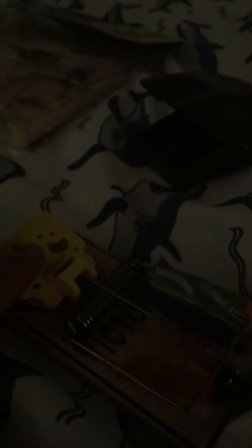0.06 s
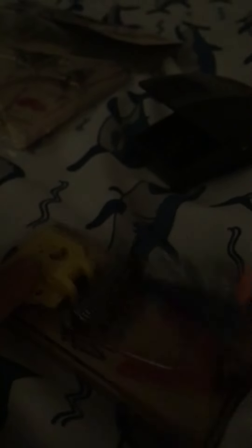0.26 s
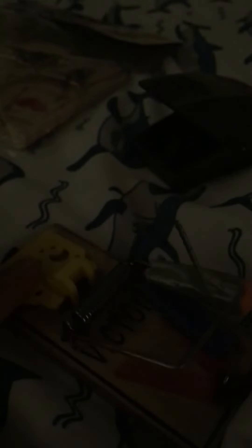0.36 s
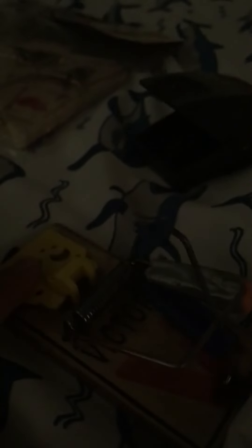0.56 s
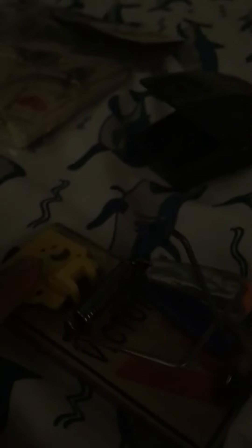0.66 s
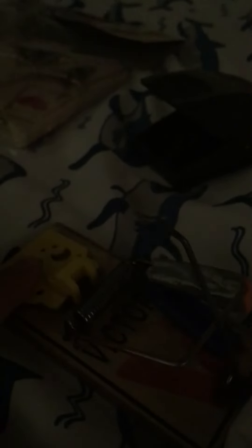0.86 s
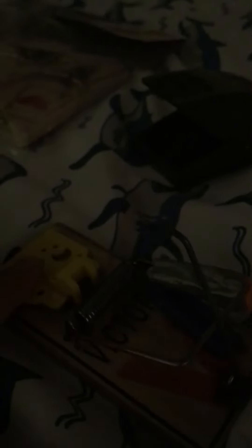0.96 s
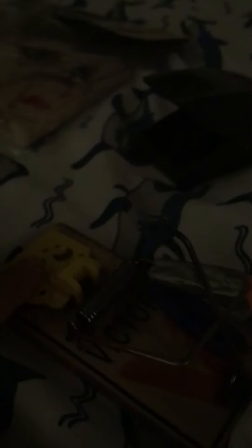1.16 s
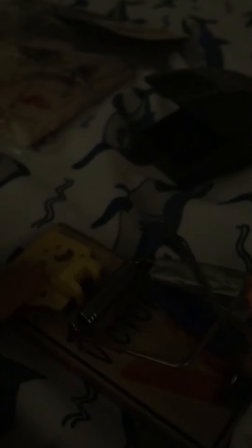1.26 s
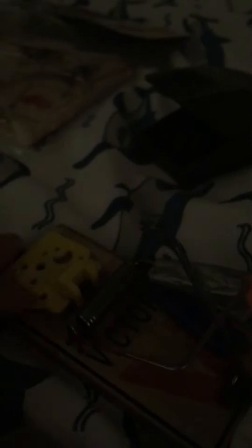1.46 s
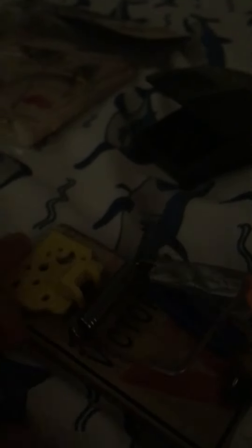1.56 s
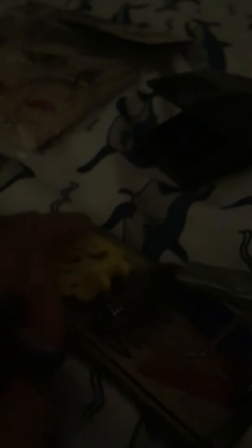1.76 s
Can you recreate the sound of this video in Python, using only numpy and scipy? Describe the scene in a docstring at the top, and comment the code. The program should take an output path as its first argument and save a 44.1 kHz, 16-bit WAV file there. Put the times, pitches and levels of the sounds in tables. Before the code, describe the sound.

A wooden mousetrap snaps shut with a sharp clatter, followed by soft knocks and rustling.

```python
"""A wooden snap trap springs: the catch scrapes and slips, and the wire bar snaps over and clatters.
Each impact excites the trap's damped modes as a sharp click, and the loose hook wire sings thinly.
The base knocks on the cloth it lies on, and the bedding heaves below at its low resonances.
Later a hand brushes in with friction noise, knocks the base and ticks the wire.
The quiet room adds faint reflections, hiss, a low hum and a rumble."""
import sys
import numpy as np
from scipy import signal
from scipy.fft import rfft, irfft
from scipy.io import wavfile

SR = 44100
rng = np.random.default_rng(int(sys.argv[2]) if len(sys.argv) > 2 else 0)


def store_pcm(level_fs):
    """Save levels as 16-bit WAV."""
    pcm = np.round(np.clip(level_fs, -1, 1) * 32767).astype(np.int16)
    wavfile.write(sys.argv[1], SR, np.atleast_2d(pcm).T)


N = 79380


def from_db(db):
    return 10 ** (np.asarray(db) / 20)


def unit_rms(x):
    return x / np.sqrt(np.mean(x ** 2) + 1e-20)


def envelopes(rows):
    """Linear interpolation: each column after the time becomes one value per sample."""
    times, *columns = np.transpose(rows)
    return [np.interp(np.arange(N) / SR, times, column) for column in columns]


def at_frequency(frequencies, values, hz):
    return np.interp(np.log(hz), np.log(frequencies), values)


def resonator(force, hz, t60):
    """Damped oscillator: a unit impulse starts a decaying sine of height about 1."""
    decay, angle = from_db(-60 / (t60 * SR)), 2 * np.pi * hz / SR
    return signal.lfilter([0, np.sin(angle)], [1, -2 * decay * np.cos(angle), decay ** 2], force + 1e-18)


def coloured_noise(spectrum):
    """Spectral shaping: white noise is weighted by a spectrum and scaled to rms 1."""
    hz = np.maximum(np.arange(N // 2 + 1) * SR / N, 5)
    gain = from_db(at_frequency(*np.transpose(spectrum), hz))
    return unit_rms(irfft(rfft(rng.standard_normal(N)) * gain, N))


def pushed_modes(modes, times, level_db, tilt_db=0, *, cycles):
    """Pulse excitation: each mode is driven by smooth pushes lasting `cycles` of its period."""
    out = np.zeros(N)
    for hz, db, t60 in modes:
        octaves = np.log2(hz / modes[0][0])
        impulses = np.zeros(N)
        impulses[(times * SR).astype(int)] = from_db(level_db + db + tilt_db * octaves)
        pulse = np.hanning(int(cycles * SR / hz) + 3)
        force = np.convolve(impulses, pulse / pulse.sum())[:N]
        out += resonator(force, hz, t60)
    return out


# Spectrum of the room noise: (frequency [Hz], relative level [dB])
ROOM_SPECTRUM = [(15, -60.5), (25, -34), (35, -12.5), (48, -5.5), (70, -2.5), (92, -14.5), (124, -6.5),
                 (146, -22), (232, -24), (553, -35), (634, -38), (3150, -43), (4990, -46.5), (14800, -43),
                 (16500, -60.5)]
def room(noise_db=-57, hum_hz=116.83, hum_db=-60.5, rumble_hz=60, rumble_db=-59.5):
    """Superposition: bass-heavy noise with faint hiss, a pure hum and a wavering narrow-band rumble."""
    rumble = unit_rms(resonator(rng.standard_normal(N + SR), rumble_hz, t60=0.0944)[SR:])
    hum = np.sqrt(2) * np.sin(2 * np.pi * hum_hz * np.arange(N) / SR)
    noise = coloured_noise(ROOM_SPECTRUM)
    return from_db(noise_db) * noise + from_db(hum_db) * hum + from_db(rumble_db) * rumble


# Envelope of the hand's stroke: (time [s], level [dB])
BRUSH_ENVELOPE = [(1.05, -91), (1.12, -74), (1.2, -65.5), (1.28, -71.5), (1.37, -71), (1.41, -61.5),
                  (1.48, -56), (1.55, -51), (1.62, -53), (1.69, -51), (1.8, -51)]
# Spectrum of the rubbed cloth: (frequency [Hz], relative level [dB])
BRUSH_SPECTRUM = [(180, -19), (300, -1), (399, -11), (1450, -11), (1580, -10.5), (4460, -15.5), (14900, -8),
                  (15700, -24.5), (16500, -33.5)]
def hand_brush():
    """Friction noise: a hand on cloth gives a broad spectrum that swells with the stroke."""
    level_db, = envelopes(BRUSH_ENVELOPE)
    return from_db(level_db) * coloured_noise(BRUSH_SPECTRUM)


# Pushes on the bedding: (time [s], level [dB])
HEAVES = [(.178, -41), (.2, -22), (.216, -29), (.262, -29), (0.3, -30), (0.317, -37.5), (.353, -38),
          (.437, -44), (1.522, -35.5), (1.565, -36), (1.604, -35.5), (1.62, -32.5), (1.709, -47),
          (1.775, -45)]
# Modes of the bedding: (frequency [Hz], gain [dB], T60 [s])
BEDDING_MODES = [(59.4, 2.5, .14), (73.254, -3.5, 0.17)]
def bedding_heaves():
    """Mass-spring resonance: the soft bedding heaves under the trap at low frequencies."""
    return pushed_modes(BEDDING_MODES, *np.transpose(HEAVES), cycles=0.39)


# Knocks of the base: (time [s], level [dB], tilt above the lowest mode [dB/octave])
KNOCKS = [(.036, -50.5, -1.5), (0.151, -47.5, -2.5), (0.178, -26, -1.5), (0.2001, -12.5, 0.5),
          (.253, -35, 3.5), (.268, -39.5, -4.5), (0.329, -49.5, -17.5), (1.49, -52, -2.5),
          (1.5268, -29, -7.5), (1.5600, -35, -1), (1.607, -39, 1.5), (1.665, -48, 2), (1.712, -44, -5.5),
          (1.77, -49.5, -2.5)]
# Modes of the wooden base: (frequency [Hz], gain [dB], T60 [s])
BASE_MODES = [(126.05, 0.5, 0.054), (185, -1.5, 0.039), (270, 1, 0.028), (395.67, -6.5, 0.012)]
def base_knocks():
    """Cushioned impact: the base lands on cloth and its low modes ring briefly."""
    return pushed_modes(BASE_MODES, *np.transpose(KNOCKS), cycles=0.1878)


def reflections(direct, level_db=-23.5, t60=0.058, delay_s=0.003):
    """Reverberation: convolution with exponentially decaying noise gives a faint, short wash."""
    t = np.arange(SR // 4) / SR
    response = rng.standard_normal(len(t)) * from_db(-60 * t / t60) * (t > delay_s)
    response /= np.sqrt(np.sum(response ** 2))
    return from_db(level_db) * signal.fftconvolve(direct, response)[:N]


# Flicks of the hook: (time [s], level [dB])
FLICKS = [(.2890, -50), (.3290, -45), (.3430, -46)]
# Modes of the hook wire: (frequency [Hz], gain [dB], T60 [s])
HOOK_MODES = [(13028, -0.5, 0.07151), (14700, -3.5, .05)]
def hook_wire():
    """Free vibration: the loose hook wire sings thinly after each flick."""
    return pushed_modes(HOOK_MODES, *np.transpose(FLICKS), cycles=1)


# Five bands that carry the slips and impacts: (nominal frequency [Hz])
BAND_HZ = [800, 1700, 3200, 6000, 12000]
# Spectrum of the slips, one entry a band: (gain [dB])
SLIP_BAND_DB = [-26.5, -1.5, -2.5, -1, 1.5]
# Course of the scrape: (time [s], relative level [dB], tilt about 1700 Hz [dB/octave])
SCRAPE = [(.022, -100, -1), (.032, -67, -4.5), (.055, -59, -1.5), (.09, -59, -4), (.13, -65, -7.5),
          (.152, -73, -6), (.171, -61, -2.5), (.176, -37.5, 2), (.215, -68, 4), (.238, -60.5, -1),
          (.256, -55.5, 1), (.285, -69, 0), (.325, -72, 2), (.332, -46.5, 2), (.352, -69.5, 4),
          (.38, -61.5, 1.5), (.405, -62.5, 0), (.415, -73, -8), (.47, -95.5, 0), (1.4, -92.5, 2),
          (1.5, -69.5, 0.5), (1.6, -61, -9.5), (1.7, -60, -10.5), (1.8, -59.5, -6.5)]
def scrape(slips_per_s=5000, gain_db=-16):
    """Stick-slip friction: wire and plate slide in dense, tiny slips of uneven size, one train a band."""
    level_db, tilt_db = envelopes(SCRAPE)
    slips = (rng.random(N) < slips_per_s / SR) * rng.standard_normal((len(BAND_HZ), N))
    octaves = np.log2(np.array(BAND_HZ)[:, None] / BAND_HZ[1])
    band_db = np.array(SLIP_BAND_DB)[:, None] + level_db + tilt_db * octaves
    return from_db(band_db + gain_db) * unit_rms(slips)


# Impacts of wire, plate and base:
# (time [s], level in each of the five bands [dB], gain into the modes [dB], chatter time constant [ms])
IMPACTS = [(0.03, -62, -58.5, -63, -65, -63, -1.5, 0.497), (0.0357, -48, -54, -59, -65, -59, -3.5, 0.755),
           (.1560, -71, -72, -65.5, -60.5, -56.5, -3, 0.993),
           (0.1739, -47.5, -19, -18, -21, -21, -6, 0.4636),
           (.1790, -5.5, -16, -15, -12.5, -12, -9.5, 0.5808),
           (0.1815, -9, -11.5, -14, -42.5, -7, -12, 0.319),
           (.1880, -41, -29.5, -41, -37, -37.5, -10.5, 1.119),
           (0.1966, -48.5, -11, -29.5, -27.5, -30, -3.5, 0.3574),
           (0.1979, -35.5, -20.5, -16, -30, -8.5, -8.5, 0.3834),
           (0.1999, -14, -24, -21.5, -23.5, -13.5, -12, .6), (.2050, -55, -48.5, -42, -34, -40, -4, 0.77),
           (0.2098, -60, -44, -52.5, -43.5, -30, -14, 0.4),
           (.2185, -49.5, -51.5, -50, -34.5, -46.5, -9.5, 0.97), (.2420, -60, -51, -52, -49, -44, -7, .6),
           (.2460, -58, -50, -48, -38, -42, -6, 1.7), (0.2486, -53.5, -48.5, -42.5, -41, -31, -11.5, .6),
           (0.2519, -37, -26, -32, -24, -23.5, -4, 0.43), (0.2515, -34.5, -22.5, -42, -12, -16, -6.5, 0.26),
           (.2530, -32, -31, -25, -13.5, -23, -5.5, .15), (0.2689, -54, -35, -38.5, -39.5, -29, -2, 0.58),
           (.2720, -56.5, -38, -43.5, -40.5, -29.5, -7.5, 2.7),
           (0.2883, -55.5, -43, -51, -41, -36.5, -5, .6), (0.3106, -65, -52, -56, -40, -35.5, -5.5, 1.99),
           (0.3283, -55, -37.5, -29, -25.5, -17.5, -1, 1.889),
           (0.3424, -65.5, -35, -40, -30.5, -21.5, -7.5, 2.209),
           (.3570, -68, -58.5, -52, -48, -44.5, -1.5, 1.094),
           (0.3828, -73.5, -50, -50, -53, -38.5, -0.5, 0.459), (.4236, -74, -78.5, -67, -56, -46.5, 3, .5),
           (1.5260, -63, -55.5, -57, -65, -54, 2.5, 1.745), (1.5380, -59.5, -54, -50.5, -55, -69, 2, 0.85),
           (1.5560, -44, -51, -47.5, -42, -30.5, 0.5, 1.322),
           (1.5597, -32, -53.5, -41, -46.5, -55, 0, 0.7993),
           (1.5732, -64, -65.5, -46.5, -61.5, -43.5, 2, 0.57),
           (1.6060, -64, -46, -52.5, -46.5, -44, 2, 1.472),
           (1.6100, -43.5, -56.5, -44, -53, -35, 0.5, 4.717), (1.71, -53.5, -36, -53, -64.5, -56, 1, 0.917),
           (1.7252, -46, -37.5, -54, -63, -58, 0, 0.836), (1.7261, -58, -36.5, -32, -54, -33.5, 0, 0.4082),
           (1.7493, -55, -42.5, -43.5, -37.5, -43, 1, 0.5644),
           (1.765, -55.5, -36, -42.5, -61.5, -57.5, -4, 0.3305),
           (1.7760, -58, -58.5, -43.5, -61.5, -51, -1, 0.4455),
           (1.7810, -60.5, -53.5, -59.5, -51.5, -42, -2, 0.681)]
def impacts(touch_to_chatter=0.8, length=500):
    """Impulsive contact: a first touch, then decaying chatter; returns bare noise and modal drive."""
    rows, bands = np.array(IMPACTS), len(BAND_HZ)
    times, band_db, drive_db = rows[:, 0], rows[:, 1:6, None], rows[:, 6]
    decay_s = rows[:, 7, None, None] / 1000
    t = np.arange(length) / SR
    bursts = rng.standard_normal((len(rows), bands, length)) * np.exp(-t / decay_s)
    bursts /= np.sqrt(np.sum(bursts ** 2, axis=2, keepdims=True))
    bursts[:, :, 0] = touch_to_chatter * np.sign(bursts[:, :1, 0])  # first touch, in phase across bands
    bursts *= from_db(band_db) / np.sqrt(1 + touch_to_chatter ** 2)
    bare, drive = np.zeros((2, bands, N + length))
    for time, burst, db in zip(times, bursts, drive_db):
        start = int(time * SR)
        bare[:, start:start + length] += burst
        drive[:, start:start + length] += burst * from_db(db)
    return bare[:, :N], drive[:, :N]


# Modes of the trap: (frequency [Hz], gain [dB], T60 [s])
TRAP_MODES = [(650, 1.5, 0.014), (1055.7, -7.5, 0.017), (1609.2, -4, 0.03), (1886.5, 1, 0.013),
              (2520, -0.5, 0.0071), (3216.8, 5.5, .018), (3613.7, 2.5, 0.0083), (5363.7, -5, 0.0087),
              (5884.2, 4, 0.0095), (7129, -5.5, 0.0051), (8598.2, -3.5, 0.0089), (9617, 3, 0.0065),
              (11457, 1.5, 0.0082), (13683, -2.5, .005), (14607, -3, 0.013)]
def snap_trap(impact_noise_db=20.5, slip_noise_db=8.5):
    """Modal superposition: impacts and slips ring the trap, and their contact noise also radiates."""
    bare, drive = impacts()
    slips = scrape()
    out = np.zeros(N)
    for hz, db, t60 in TRAP_MODES:
        # each mode draws its power from the nearest bands
        weights = np.sqrt([at_frequency(BAND_HZ, band, hz) for band in np.eye(len(BAND_HZ))])
        out += from_db(db) * resonator(weights @ (drive + slips), hz, t60)
    contact_noise = from_db(impact_noise_db) * bare + from_db(slip_noise_db) * slips
    edges_hz = [450, 1200, 2300, 4400, 8500, 18000]
    for train, low, high in zip(contact_noise, edges_hz, edges_hz[1:]):
        bandpass = signal.butter(2, [low, high], "band", fs=SR, output="sos")
        out += signal.sosfilt(bandpass, train)
    return out


def scene():
    """Linear superposition: all sources add in one channel; trap and hook also excite reflections."""
    clatter = snap_trap() + hook_wire()
    handling = hand_brush() + bedding_heaves() + base_knocks()
    return (clatter + reflections(clatter) + handling + room())[None]


def record(dry, low_hz=46.827, stopband_hz=16700):
    """Band limiting: the small microphone drops the deepest bass, and the highest treble is cut."""
    highpass = signal.butter(3, low_hz, "high", fs=SR, output="sos")
    lowpass = signal.cheby2(16, 80, stopband_hz, fs=SR, output="sos")
    return signal.sosfilt(lowpass, signal.sosfilt(highpass, dry))


dry = scene()
out = record(dry)
store_pcm(out)
```